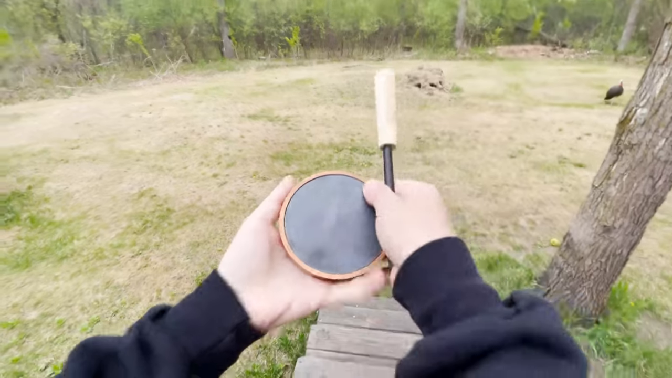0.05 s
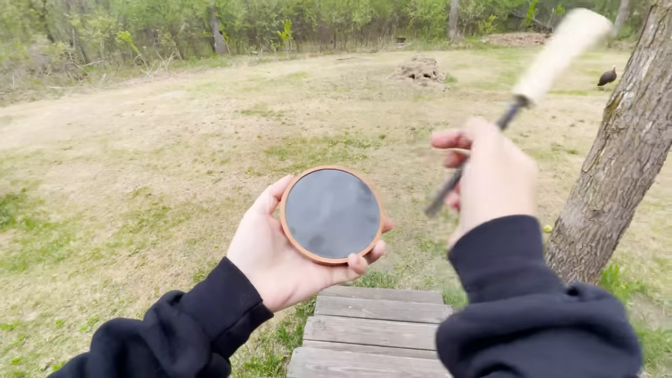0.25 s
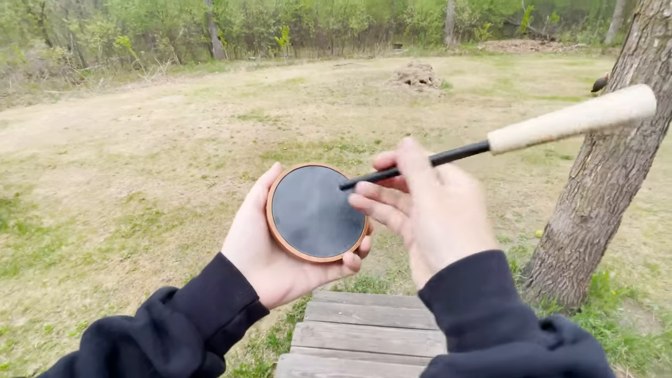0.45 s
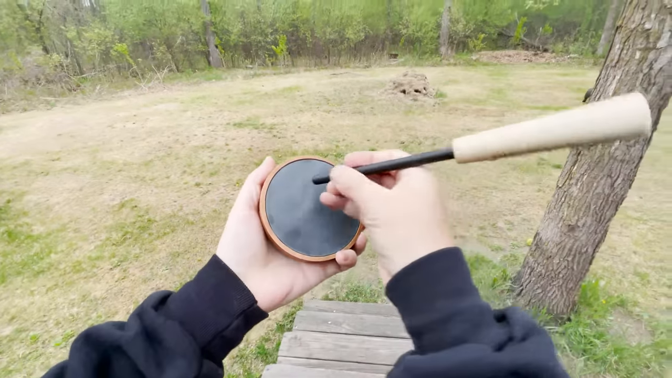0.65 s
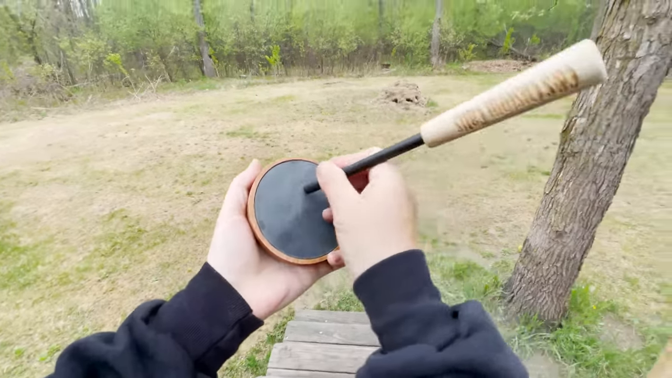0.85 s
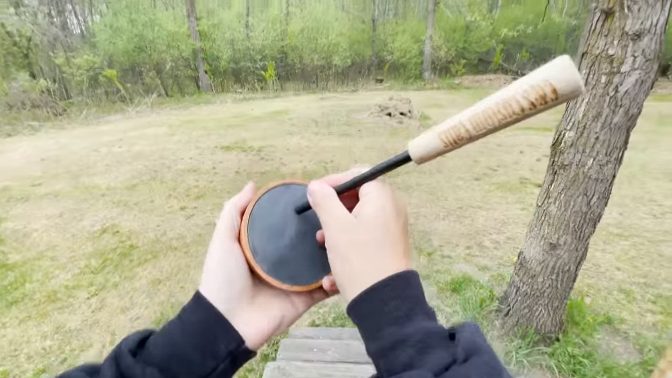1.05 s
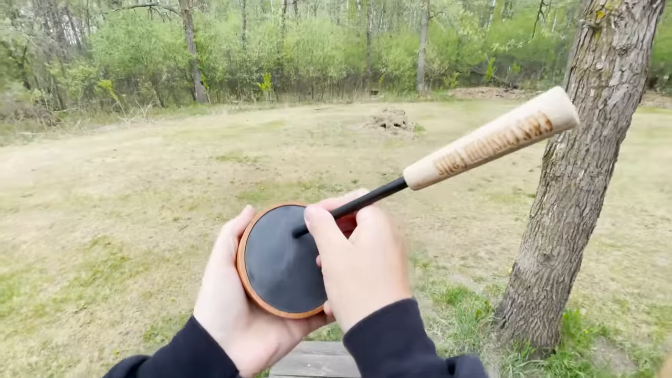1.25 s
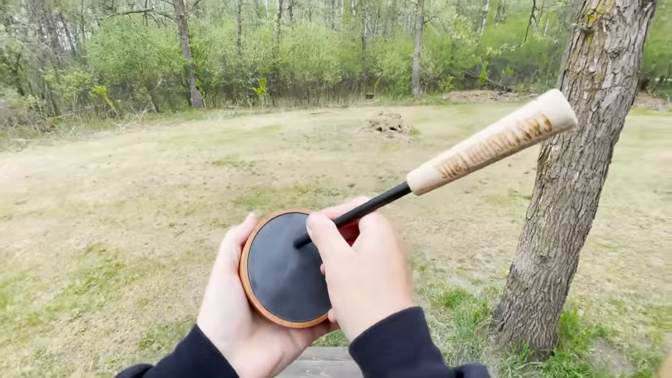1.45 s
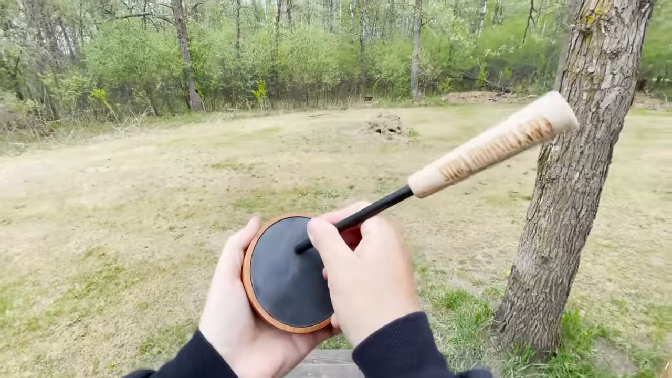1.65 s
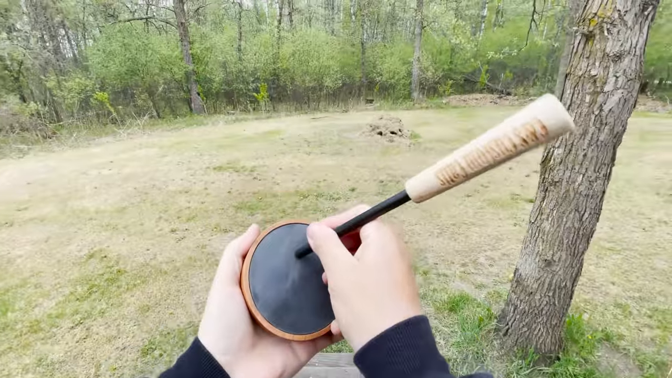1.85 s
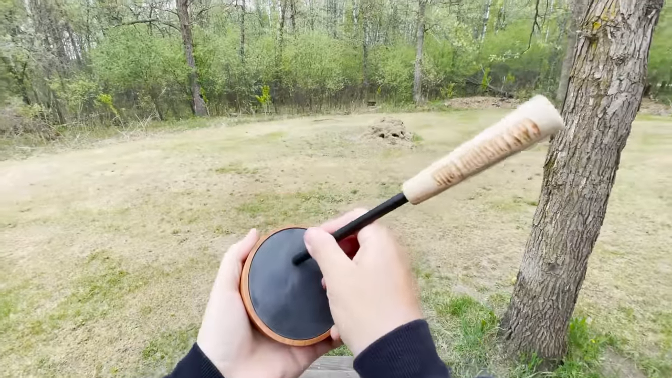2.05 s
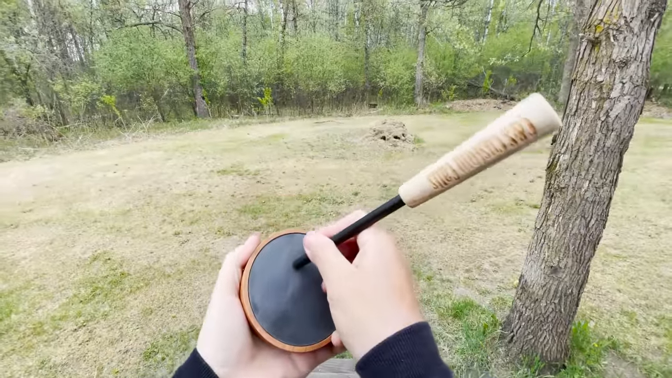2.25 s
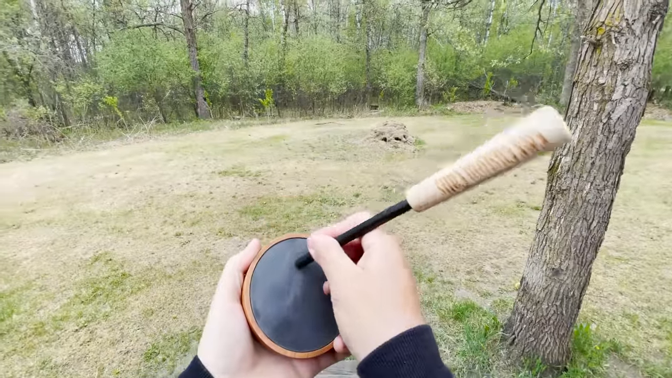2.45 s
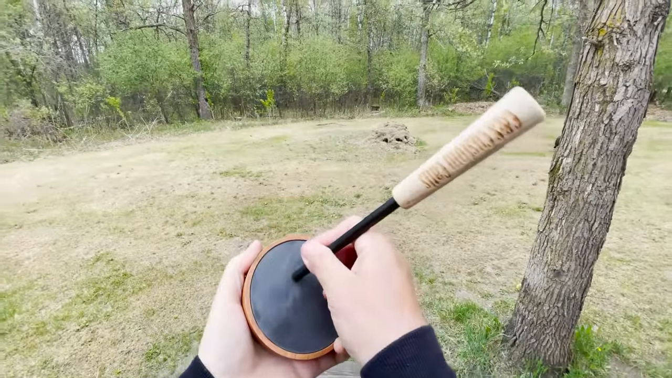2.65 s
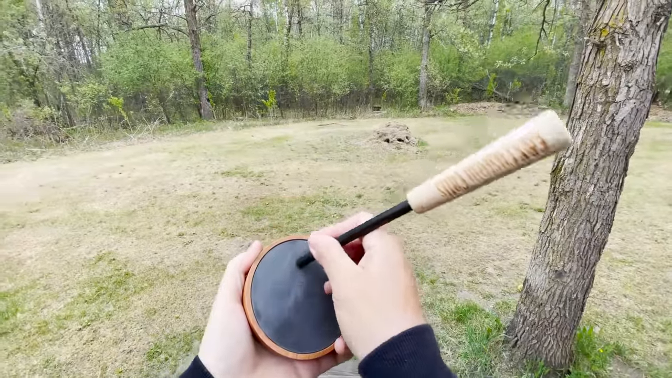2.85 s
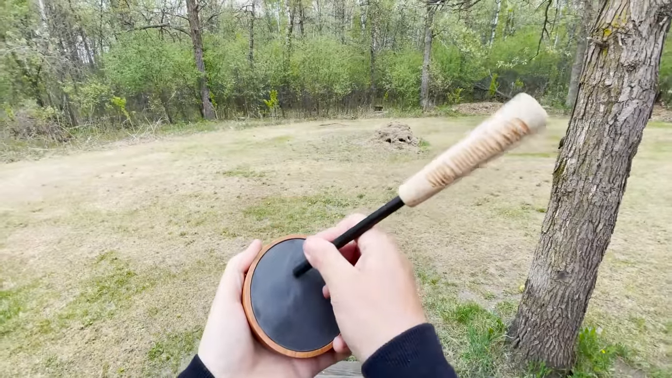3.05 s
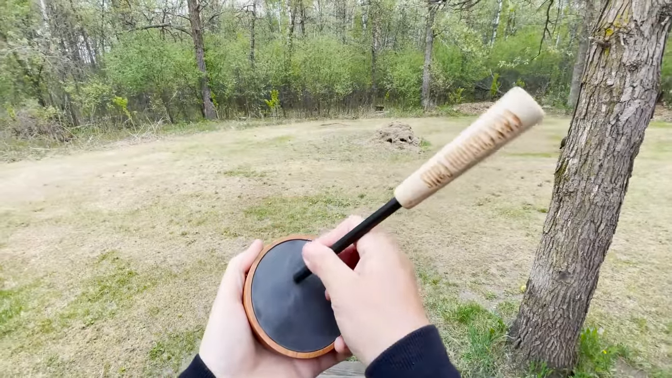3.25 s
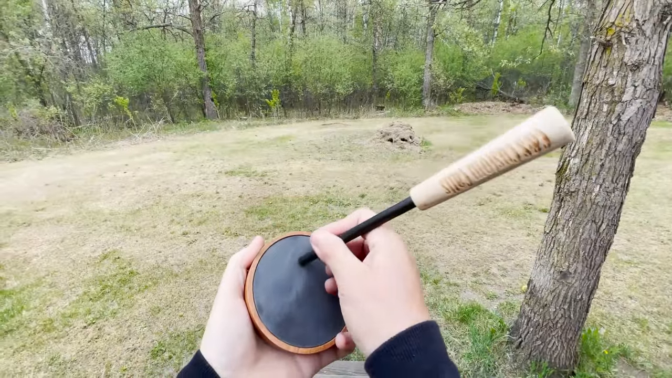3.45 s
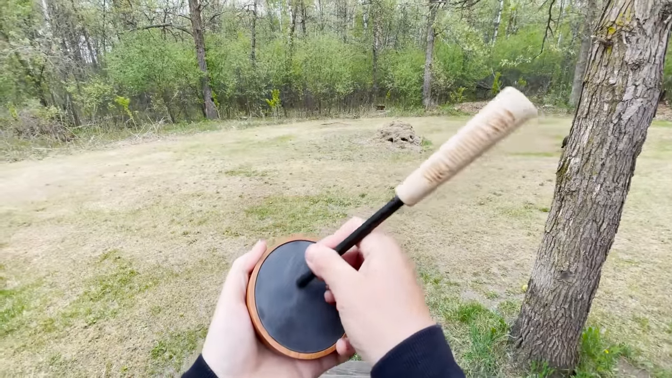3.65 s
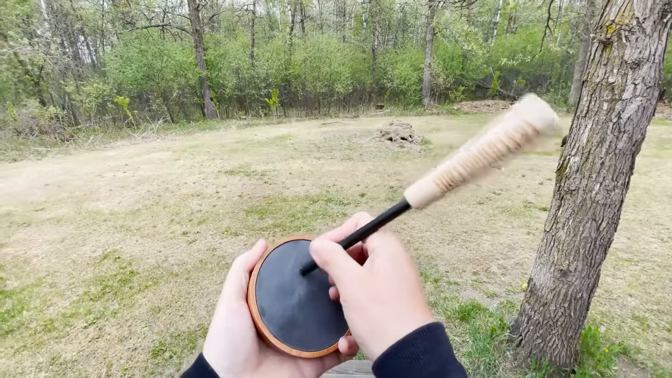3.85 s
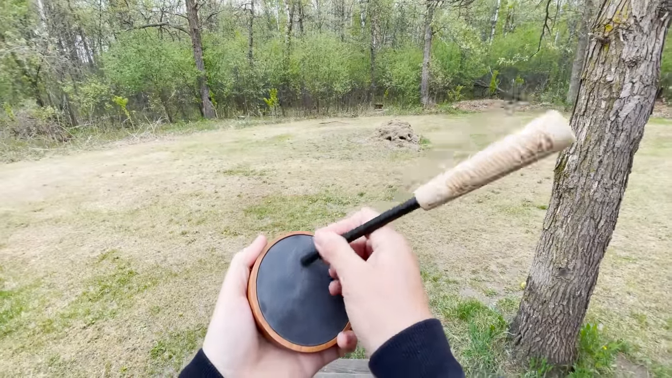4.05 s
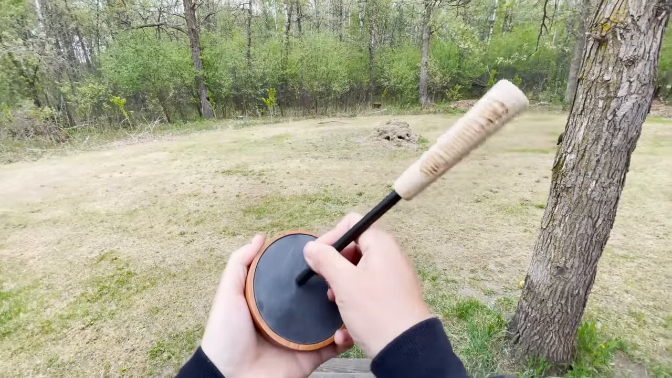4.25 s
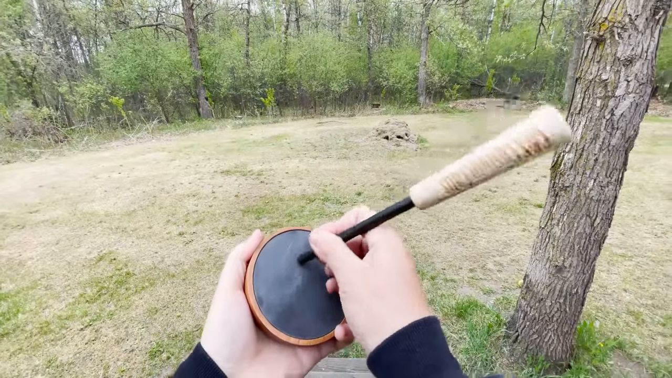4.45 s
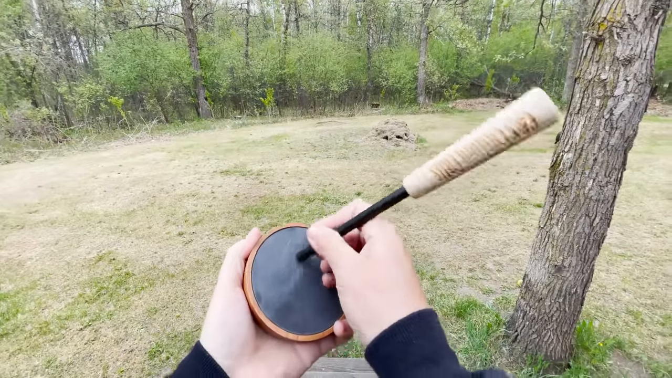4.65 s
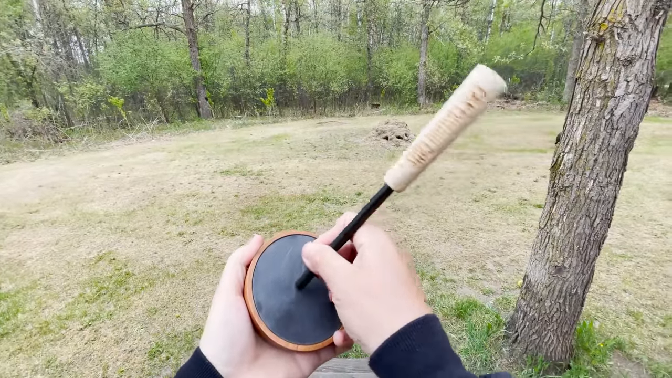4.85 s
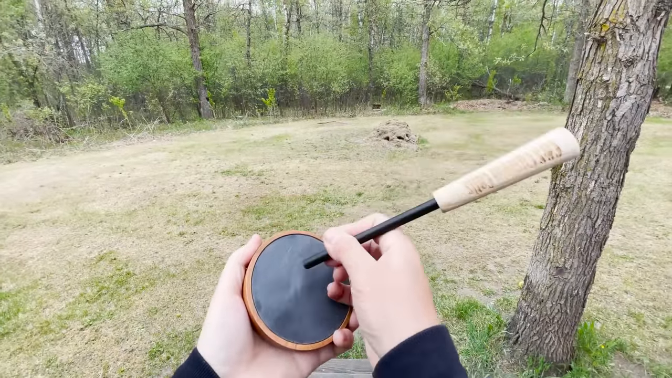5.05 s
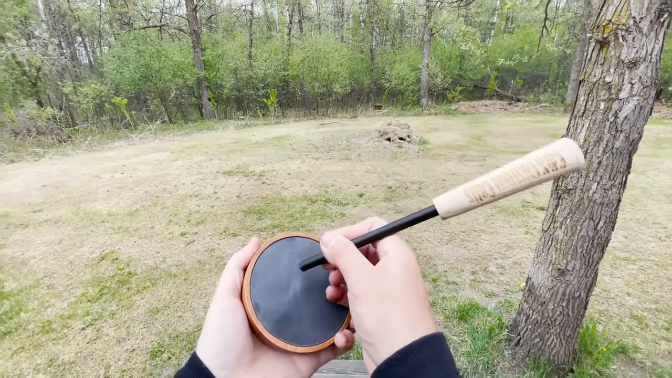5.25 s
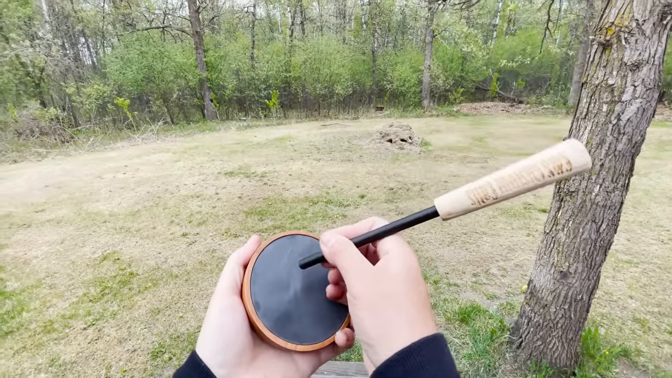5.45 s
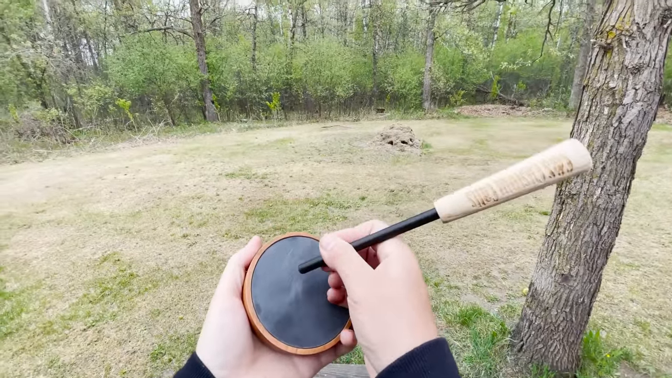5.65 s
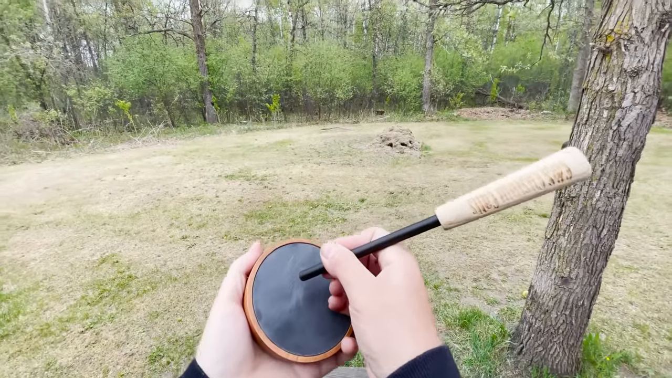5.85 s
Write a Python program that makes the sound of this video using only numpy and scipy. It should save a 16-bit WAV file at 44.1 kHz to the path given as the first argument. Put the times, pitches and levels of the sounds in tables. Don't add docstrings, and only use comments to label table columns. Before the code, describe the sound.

After faint knocks and a tap, eleven nasal, scratchy hen-turkey yelps scrape from a slate call, then quiet open air remains.

```python
import sys
import numpy as np
from scipy import signal
from scipy.fft import rfft, irfft, next_fast_len
from scipy.io import wavfile
from scipy.ndimage import uniform_filter1d, minimum_filter1d

SR = 44100
rng = np.random.default_rng(int(sys.argv[2]) if len(sys.argv) > 2 else 0)


def gain_from_db(level_db):
    decades = np.asarray(level_db, float) / 20
    return 10 ** decades


def store_pcm(level_fs):
    pcm = np.round(np.clip(level_fs, -1, 1) * 32767).astype(np.int16)
    wavfile.write(sys.argv[1], SR, np.atleast_2d(pcm).T)


N = 260631
T = np.arange(N) / SR

# touch_s, lock_s (pitch locks), clear_s (rasp clears), lift_s, start_pitch_hz
STROKES = [(1.39, 1.396, 1.492, 1.558, 720), (1.806, 1.819, 1.895, 1.93, 800),
           (2.187, 2.21, 2.28, 2.322, 910), (2.52, 2.537, 2.63, 2.665, 930),
           (2.86, 2.885, 2.96, 2.992, 880), (3.2, 3.218, 3.28, 3.316, 1000),
           (3.527, 3.542, 3.612, 3.627, 970), (3.838, 3.872, 3.908, 3.953, 950),
           (4.154, 4.179, 4.226, 4.253, 980), (4.473, 4.484, 4.533, 4.555, 900),
           (4.788, 4.809, 4.855, 4.873, 930)]
# start_s, end_s, pitch_hz
CATCHES = [(1.435, 1.441, 610), (1.855, 1.864, 580), (2.227, 2.237, 600), (2.237, 2.261, 520),
           (2.576, 2.592, 530), (2.599, 2.606, 530), (2.619, 2.626, 590), (2.915, 2.925, 560),
           (2.935, 2.94, 580), (2.952, 2.957, 580), (3.258, 3.265, 570), (3.583, 3.591, 520),
           (3.894, 3.902, 530), (4.207, 4.215, 510), (4.507, 4.515, 550), (4.824, 4.83, 550),
           (4.848, 4.853, 550)]
# hardest_s, landing_db, hardest_db, easing_db, grit_db (against the tone)
PRESSURE = [(1.475, -27, -22, -27.5, -26), (1.865, -27, -16, -20, -23), (2.245, -27, -14, -20, -21.5),
            (2.625, -27, -14.5, -20.5, -18), (2.93, -25.5, -13, -17, -14), (3.24, -24, -12, -17.5, -14),
            (3.575, -20, -11.5, -19, -11), (3.895, -31, -12.5, -17, -9.5), (4.2, -23.5, -11.5, -16, -7.5),
            (4.52, -20, -12, -14.5, -8.5), (4.84, -35, -11.5, -15.5, -8.5)]
# start_s, fastest_s, end_s, hiss_db
RETURN_STROKES = [(1.6, 1.66, 1.745, -55.5), (1.99, 2.06, 2.125, -53), (2.375, 2.425, 2.495, -51.5),
                  (2.705, 2.765, 2.83, -51), (3.02, 3.095, 3.155, -53), (3.365, 3.418, 3.478, -49.5),
                  (3.665, 3.728, 3.795, -51.5), (3.99, 4.03, 4.105, -53.5), (4.28, 4.34, 4.42, -55),
                  (4.575, 4.65, 4.73, -53.5)]
# mode_hz, width_hz, level_db
POT_MODES = [(420, 250, -16), (660, 1110, -16.5), (1080.6, 92, 3), (1373, 230, -5.5), (1739, 280, 2),
             (1971.5, 89, 8.5), (2650, 44, -6), (2983, 386, -7), (3301, 223, -9.5), (3750, 560, -11),
             (4960, 220, -22), (6113, 328, -21), (6663, 245, -28), (8450, 660, -34.5), (9370, 260, -56),
             (11080, 1060, -35), (15400, 600, -50)]
# frequency_hz, level_db
GRIT_COLOUR = [(200, -40), (600, -22), (2000, -12), (4200, -5), (5000, 8), (12000, 16), (13000, 5),
               (14600, 2), (15300, 11), (15900, 9), (16200, -30)]
# frequency_hz, level_db
HISS_COLOUR = [(600, -2), (2000, -2.5), (3500, 11), (5000, 15.5), (12000, 33.5), (13000, -6), (14600, -1),
               (15300, 34), (15900, 21), (16200, -28)]
# start_s, peak_db, pitch_hz, t60_s
TICKS = [
    (0.0142, -28, 6590, 0.0023),
    (0.3214, -57, 6260, 0.006),
    (0.4235, -40, 11000, 0.0044),
]
# start_s, peak_db, pitch_hz, t60_s
KNOCKS = [
    (0.244, -31, 75.4, 0.041),
    (1.264, -40, 304, 0.03),
    (1.287, -34, 71, 0.0304),
    (1.334, -49, 39, 0.017),
]
# start_s, peak_db, pitch_hz, t60_s
TAPS = [
    (1.152, -28, 1860, 0.03),
    (1.151, -46, 3000, 0.006),
    (1.152, -38, 1650, 0.015),
    (5.31, -53, 1580, 0.06),
    (1.152, -35, 1180, 0.025),
    (1.152, -39, 1400, .02),
]
# frequency_hz, left_lead_rad
PORT_PHASE = [(0, 0), (400, -.25), (1000, -.55), (2000, -1.25), (4050, -2.7), (5080, 1.0), (5770, 1.5),
              (6550, -2.5), (8100, 3.5), (8790, -14.2), (9300, 8), (10100, 5), (12700, 9), (13900, 9.5),
              (14900, 12.3), (16200, 12.8)]
# frequency_hz, left_over_right_db
PORT_LEVEL = [(60, 0), (110, 1), (200, 2), (380, 1), (700, -0.5), (1290, 1), (2380, 1.0), (4400, -4.5),
              (8120, -6.5), (15000, 1.5)]
# delay_s, level_db
ECHOES = [
    (.22, -46),
    (.485, -40),
    (.61, -46.5),
]
# frequency_hz, level_db (per hertz)
AIR_SPECTRUM = [(18, -25), (30, -34.5), (76, -2), (109, -8.5), (254, -8.5), (304, -11), (383, -5.5),
                (1040, -10.5), (1380, -18), (1610, -14.5), (2200, -18), (6150, -23.5), (7360, -36),
                (11100, -35), (14000, -57.5)]
# time_s, level_db
TRAFFIC_SWELLS = [
    (0, -60.5),
    (1.8, -58),
    (2.4, -58.5),
    (3, -61),
    (5, -62),
    (5.91, -60),
]
# frequency_hz, correlation (no unit)
AIR_LIKENESS = [(60, -0.016), (130, -0.07), (290, 1), (640, -0.1), (1410, -0.2), (3100, 0.13),
                (6820, -0.083), (15000, 0.64)]
# frequency_hz, left_over_right_db
AIR_BALANCE = [(60, -1.5), (110, -1.5), (200, -1), (380, 0), (700, -2.5), (1290, 0.0), (2380, -3),
               (4400, -5.0), (8120, -11.5), (15000, 12)]
# peak_s, peak_db, fall_s (to fall by 20 dB)
GUSTS = [(.245, -54, .05), (.61, -62, .13), (.9, -56, .12), (1.28, -46, .2), (1.4, -35, .06),
         (1.69, -35, .04), (1.91, -60, .15), (2.15, -49, .15), (2.4, -48, .11), (2.6, -61, .15),
         (4.1, -62.5, .25), (4.53, -48, .12), (4.7, -63, .3), (5.6, -66, .3)]


def evened(x):
    return x / np.sqrt(np.mean(x ** 2) + 1e-20)


def read(points, hz):
    f, value = np.transpose(points)
    return np.interp(np.log(hz + 1), np.log(f + 1), value)


def curve(rows, column=1):
    rows = np.array(rows)
    return np.interp(T, rows[:, 0], rows[:, column])


def levels(rows, columns):
    return uniform_filter1d(gain_from_db(sum(curve(rows, column=c) for c in columns)), 60)


def wander(size):
    drift = uniform_filter1d(uniform_filter1d(rng.standard_normal(N), size), size)
    return evened(np.tanh(evened(drift) / 2))


def steady(x, size=500):
    power = uniform_filter1d(uniform_filter1d(x ** 2, size), size)
    return x / np.sqrt(power + 1e-12)


def strokes():
    land_s, bite_s, ease_s, slide_s, let_go_s, gone_s = .005, .012, .015, .005, .005, .02
    grit_land_db, grit_let_go_db, grit_gone_db = -19, -23, -32
    rows = []
    for (touch, lock, _, lift, _), (hard, land_db, hard_db, ease_db, grit_db) in zip(STROKES, PRESSURE):
        rows += [(touch - .001, -120, 0),
                 (touch, land_db - 22, grit_land_db),
                 (touch + land_s, land_db, grit_land_db),
                 (lock, hard_db - 6.5, grit_db),
                 (lock + bite_s, hard_db - 1, grit_db),
                 (hard, hard_db, grit_db - 2),
                 (lift - ease_s, ease_db, grit_db),
                 (lift - slide_s, ease_db - 3, grit_db - 7),
                 (lift + let_go_s, -30.5, grit_let_go_db),
                 (lift + gone_s, -54, grit_gone_db),
                 (lift + 3 * gone_s, -120, grit_gone_db)]
    return rows


def slip_curves(lock_hz=664, clear_hz=667, lift_hz=686, free_hz=1000):
    rasp_top, rasp_per_db, rasp_full_db = .75, .04, -13
    pitch, rasp, snap = [], [], []
    for (touch, lock, clear, lift, start_hz), hand in zip(STROKES, PRESSURE):
        full = rasp_top + rasp_per_db * min(hand[2] - rasp_full_db, 0)
        pitch += [(touch, start_hz), (max(lock - .013, touch + .001), .95 * start_hz + 20),
                  (lock, 705), (lock + .015, lock_hz), (clear, clear_hz),
                  (lift - .004, lift_hz), (lift, 730), (lift + .006, free_hz)]
        rasp += [(lock, .07), (lock + .012, full), (clear - .008, full),
                 (clear + .006, .17), (lift - .01, .03), (lift + .005, .2)]
        snap += [(touch, -1.5), (lock, .2), (lift - .006, -.1), (lift + .003, -.9), (lift + .008, -4)]
    hz, rasp, snap = curve(pitch), np.clip(curve(rasp), 0, 1), curve(snap)
    for start, end, low_hz in CATCHES:
        held = (T > start) & (T < end)
        hz = np.where(held, low_hz, hz)
        rasp = np.where(held, 0.53 * rasp, rasp)
    return hz, rasp, snap


def slips(firm_db=-16):
    hz, rasp, snap = slip_curves()
    jitter = 1 + .04 * rasp * wander(size=150)
    turns = np.cumsum(uniform_filter1d(hz, 130) * jitter) / SR
    pairs = rasp * np.cos(np.pi * turns + 1.3 * wander(size=350))
    threes = rasp * np.cos(2 * np.pi * turns / 3 + 1.6 * wander(size=250)) * wander(size=400)
    place = turns + .13 * pairs + .06 * threes + .025 * rasp * wander(size=60)
    firm = np.clip(levels(strokes(), (1,)) / gain_from_db(firm_db), .02, 1) ** .4
    bright = gain_from_db(.35 * (curve(PRESSURE, column=4) + 14))
    blur = .011 * wander(size=90) - .4 * (place - turns)
    low = sum(np.cos(2 * np.pi * k * place + .6 * k * k) * k ** snap for k in (2, 3))
    high = sum(np.cos(2 * np.pi * k * (place + blur) + 0.5953 * k * k) * k ** snap for k in range(4, 11))
    overtones = low + 1.176 * firm * high * bright
    pulses = overtones * (1 + .6 * pairs + .4 * threes) * gain_from_db(4.3 * rasp * wander(size=140))
    fundamental = 1.2 * np.cos(2 * np.pi * turns) * (1 + .4 * pairs)
    return pulses + fundamental, place


def pot(extra=((1, 0), (2, 0))):
    hz = abs(np.fft.fftfreq(8192, 1 / SR))
    power = sum(gain_from_db(2 * db) / (1 + (2 * (hz - f) / width) ** 2) ** 1.766 for f, width, db in POT_MODES)
    log_gain = .5 * np.log(power + 1e-10) + np.log(gain_from_db(read(extra, hz)))
    return np.fft.ifft(np.exp(np.conj(signal.hilbert(log_gain)))).real[:4096]


def yelps(pulses):
    return steady(signal.oaconvolve(pulses, pot())[:N]) * levels(strokes(), (1,))


def grit(place):
    puff_shape = .3 + np.exp(-(place % 1) / 0.315)
    puffs = puff_shape * rng.standard_normal(N) * gain_from_db(3.6 * wander(size=200))
    return evened(signal.oaconvolve(puffs, pot(GRIT_COLOUR))[:N]) * levels(strokes(), (1, 2)) * gain_from_db(-2.0)


def return_speed():
    rows = []
    for start, fastest, end, _ in RETURN_STROKES:
        rows += [(start, 1), (fastest, 0), (end, 1), (end + .03, 2), (end + .15, 2)]
    away = curve(rows)
    top_db = curve([(fastest, db) for _, fastest, _, db in RETURN_STROKES])
    return gain_from_db(top_db - 24 * away ** 1.8) * (T > RETURN_STROKES[0][0])


def return_hiss():
    rub = rng.standard_normal(N) * gain_from_db(2.2 * wander(size=300))
    return evened(signal.oaconvolve(rub, pot(HISS_COLOUR))[:N]) * return_speed() * gain_from_db(2.5)


def ring(x):
    ring_hz, t60_s, level_db = 2690, .5, -43
    t = np.arange(16000) / SR
    mode = gain_from_db(-60 * t / t60_s) * np.sin(2 * np.pi * ring_hz * t)
    return gain_from_db(level_db) * signal.oaconvolve(x, mode / np.linalg.norm(mode))[:N]


def handling():
    out, t = np.zeros(N), np.arange(3000) / SR
    for s, db, hz, t60 in TICKS + TAPS + KNOCKS:
        rise = np.minimum(t * hz / 2.1, 1)
        out[round(s * SR):][:3000] += gain_from_db(db - 60 * t / t60) * rise * np.sin(2 * np.pi * hz * t)
    return out


def ports(x):
    size = next_fast_len(N)
    hz = np.fft.rfftfreq(size, 1 / SR)
    half = gain_from_db(read(PORT_LEVEL, hz) / 2) * np.exp(.5j * read(PORT_PHASE, hz))
    return irfft(rfft(x, size) * np.array([half, 1 / half]), size)[:, :N]


def yard(x, t60):
    t = np.arange(20000) / SR
    tail = rng.standard_normal((2, 20000)) * gain_from_db(-60 * t / t60) * (t > .001)
    return signal.oaconvolve(x[None], tail / np.linalg.norm(tail[0]), axes=1)[:, :N]


def slapback(x):
    dull = signal.sosfilt(signal.butter(2, [1400, 1680], "band", fs=SR, output="sos"), x)
    late = sum(gain_from_db(db) * np.pad(dull, (round(s * SR), 0))[:N] for s, db in ECHOES)
    return yard(late, 0.027)


def air(edge_hz=1150, top_hz=2500, dip_hz=5600):
    frames, hz = N // 256 + 5, np.fft.rfftfreq(1024, 1 / SR)
    a, b, c, d, patches = rng.standard_normal((frames, 513, 5)).T
    patches = evened(uniform_filter1d(uniform_filter1d(patches, 10, 0), 12, 1))
    same = np.clip(read(AIR_LIKENESS, hz), -1, 1)[:, None]
    left = a + 1j * b
    right = same * left + np.sqrt(1 - same ** 2) * (c + 1j * d)
    z = np.array([left, right])
    t = np.arange(frames) * 256 / SR
    rustle_db = 6 * np.exp(-t / .15) + 5 * np.exp(-((t - 4) / .7) ** 2)
    middle_db, top_db = -.6 + .9 * rustle_db, 1.2 + rustle_db
    leaves_db = (hz > edge_hz)[:, None] * np.where((hz > top_hz)[:, None], top_db, middle_db)
    z *= gain_from_db(read(AIR_SPECTRUM, hz)[:, None] + 0.96 * patches + leaves_db)
    z *= gain_from_db(-6 / (1 + ((hz - dip_hz) / 250) ** 2))[:, None]
    z *= gain_from_db(np.array([.5, -.5])[:, None, None] * read(AIR_BALANCE, hz)[:, None])
    noise = signal.istft(z, nperseg=1024, noverlap=768)[1][:, :N]
    return gain_from_db(curve(TRAFFIC_SWELLS) + 5) * evened(noise)


def gusts(calm_db=-82):
    t = T[::100]
    puffs = sum(gain_from_db(db - 20 * abs(t - s) / fall_s) for s, db, fall_s in GUSTS)
    return np.interp(T, t, gain_from_db(calm_db) + puffs)


def wind(low_hz=40, top_hz=100):
    band = signal.butter(3, [low_hz, top_hz], "band", fs=SR, output="sos")
    push, own = signal.sosfilt(band, rng.standard_normal((2, N)) * gain_from_db(3.0 * wander(size=900)))
    return gusts() * evened(np.array([.7 * push + .25 * own, -1.1 * push]))


def scene():
    pulses, place = slips()
    tone = yelps(pulses)
    friction = grit(place) + return_hiss()
    direct = ports(tone + friction + ring(tone) + handling())
    hands = gain_from_db(-19) * yard(tone, 0.064) + gain_from_db(-7) * yard(friction, .03)
    lawn = gain_from_db(-33) * yard(tone, .6)
    return direct + hands + lawn + air() + wind() + slapback(tone)


def top_cut(x):
    return signal.sosfilt(signal.butter(12, 16660, fs=SR, output="sos"), x)


def record(dry):
    peak = -minimum_filter1d(-abs(dry).max(0), 200)
    gain = uniform_filter1d(np.minimum(.93 / peak, 1), 200)
    return top_cut(dry * gain)


dry = scene()
out = record(dry)
store_pcm(out)
```